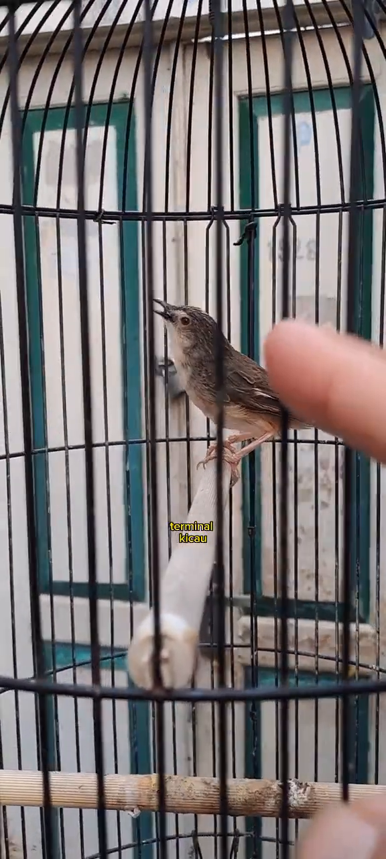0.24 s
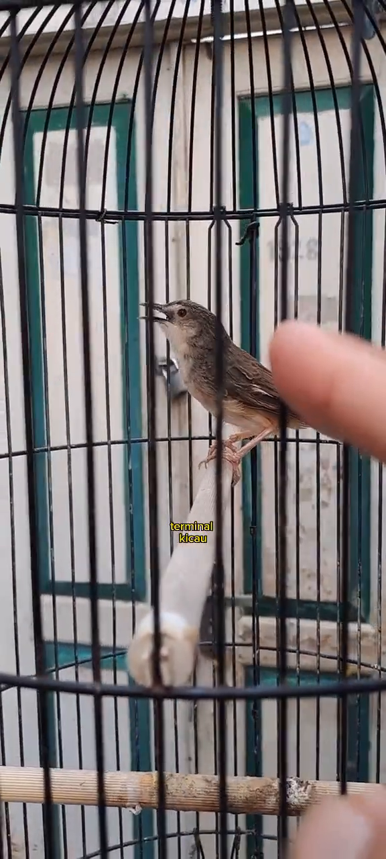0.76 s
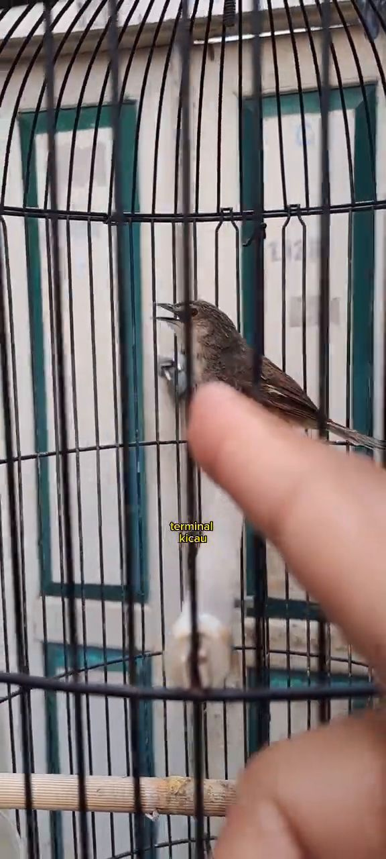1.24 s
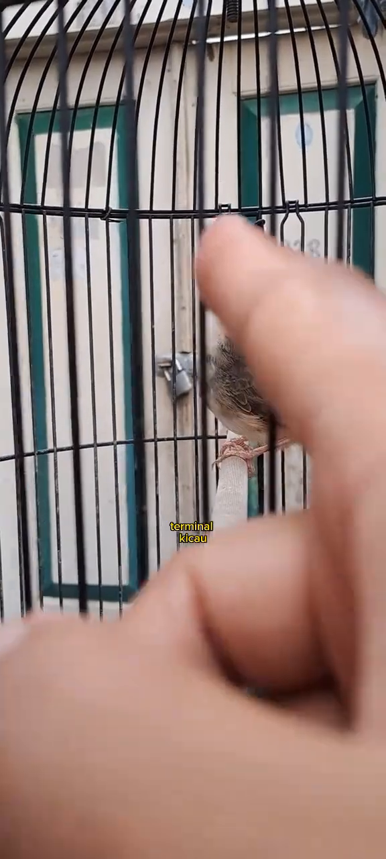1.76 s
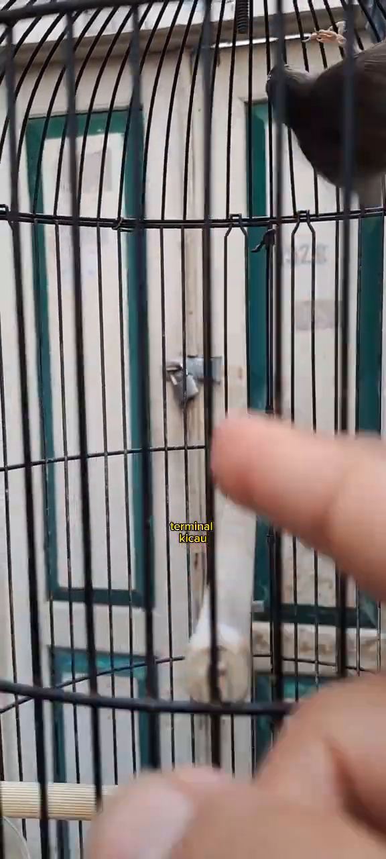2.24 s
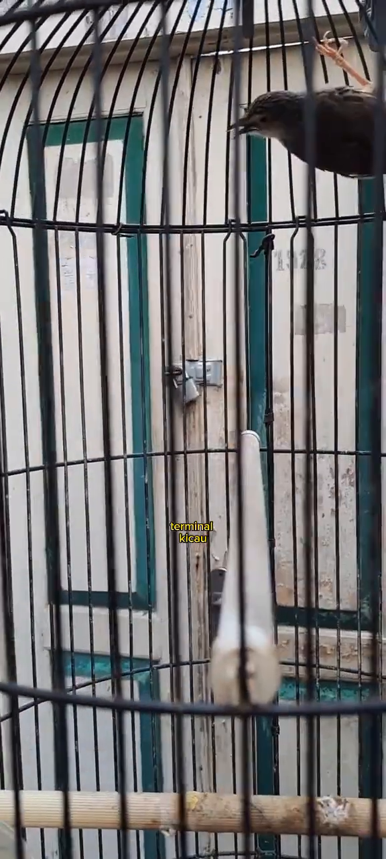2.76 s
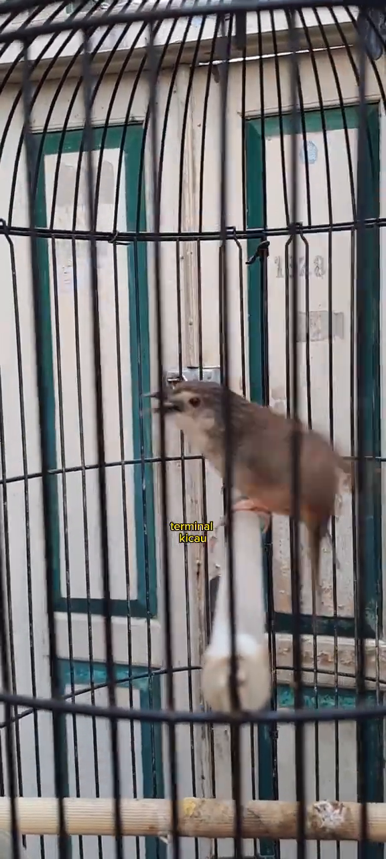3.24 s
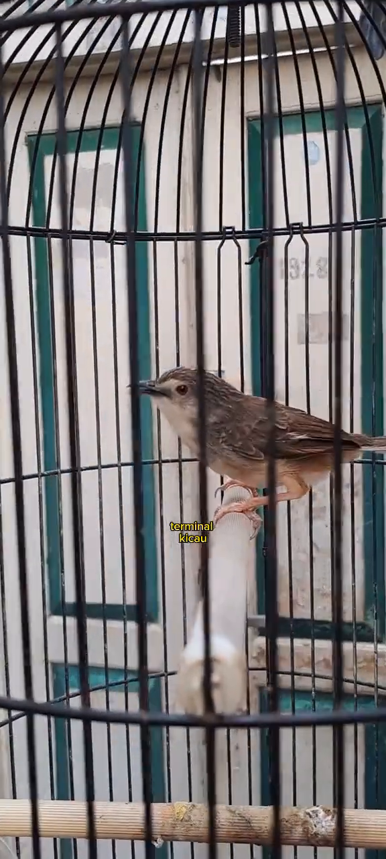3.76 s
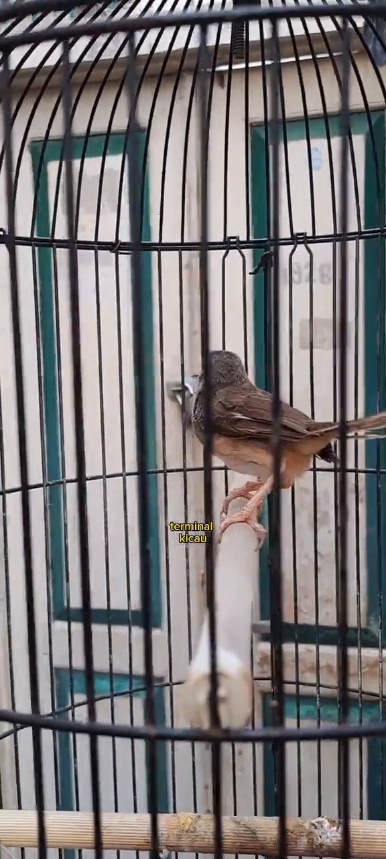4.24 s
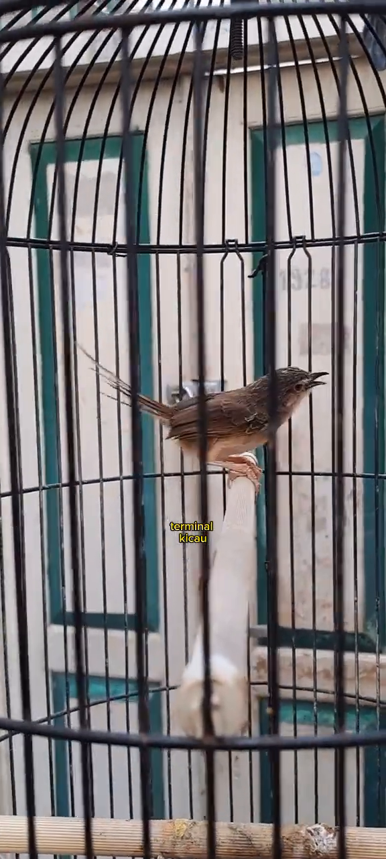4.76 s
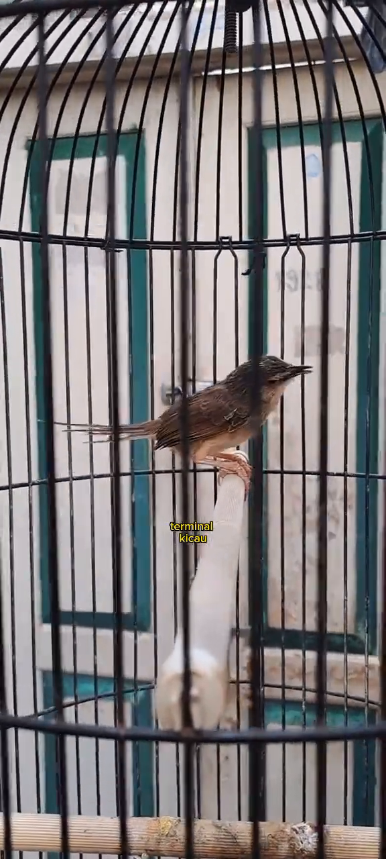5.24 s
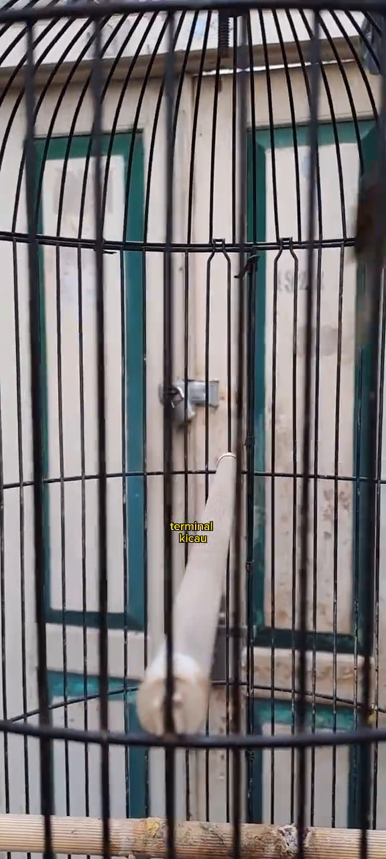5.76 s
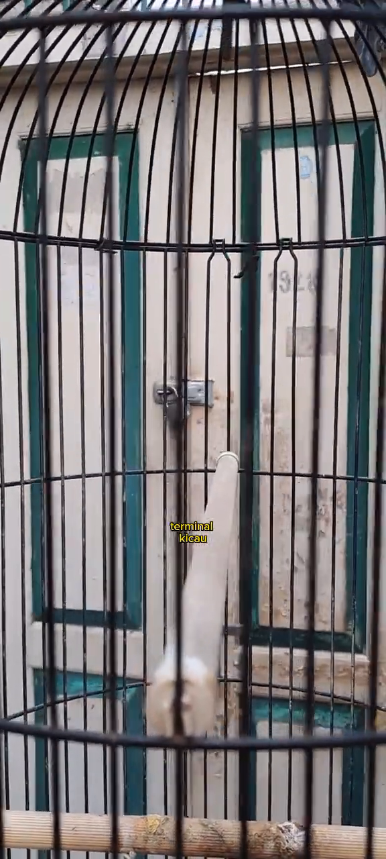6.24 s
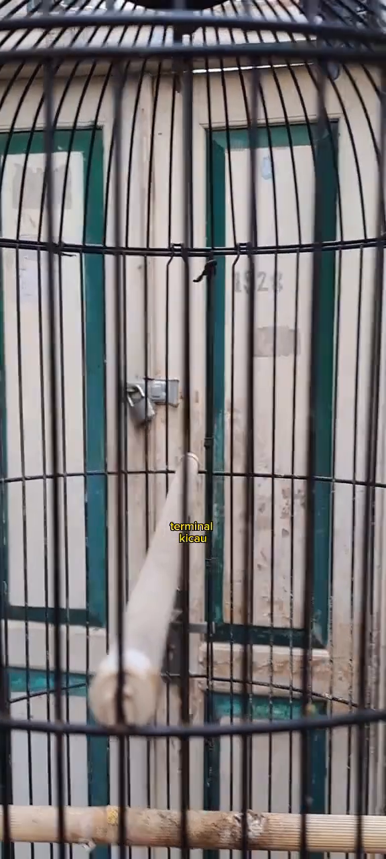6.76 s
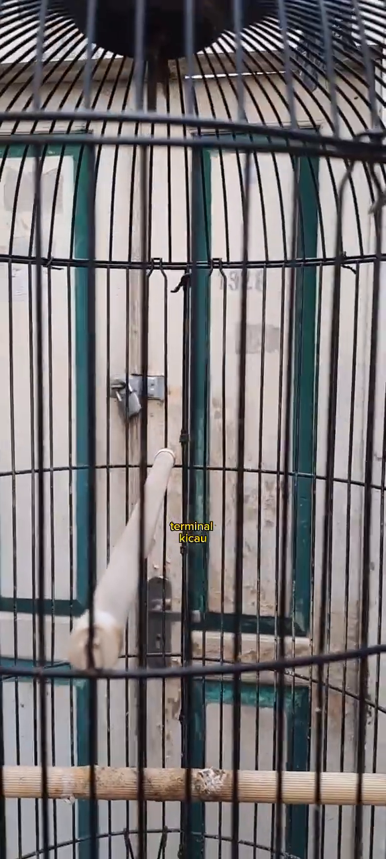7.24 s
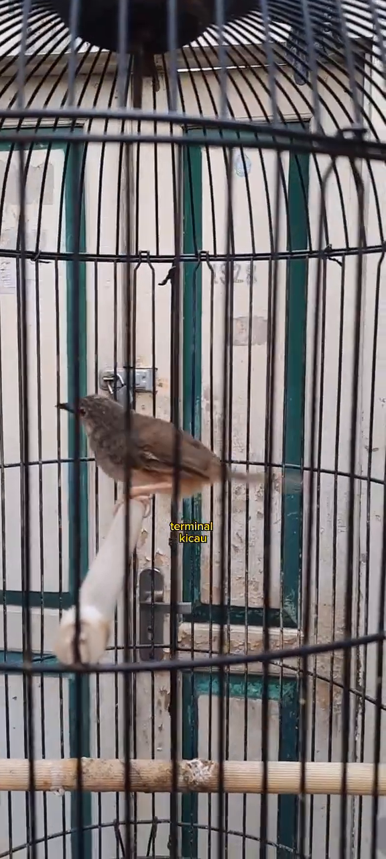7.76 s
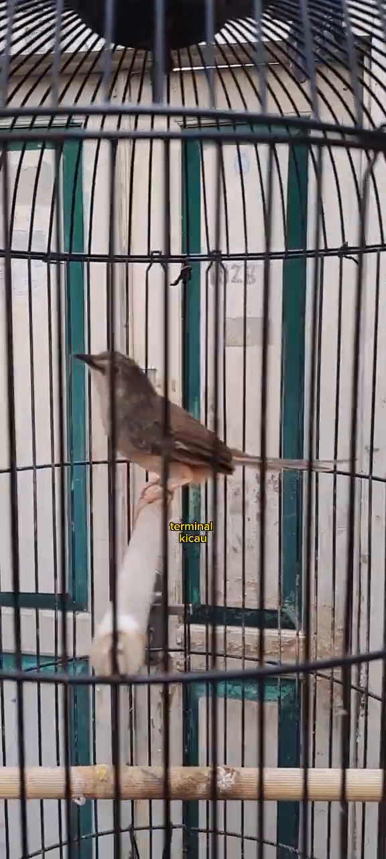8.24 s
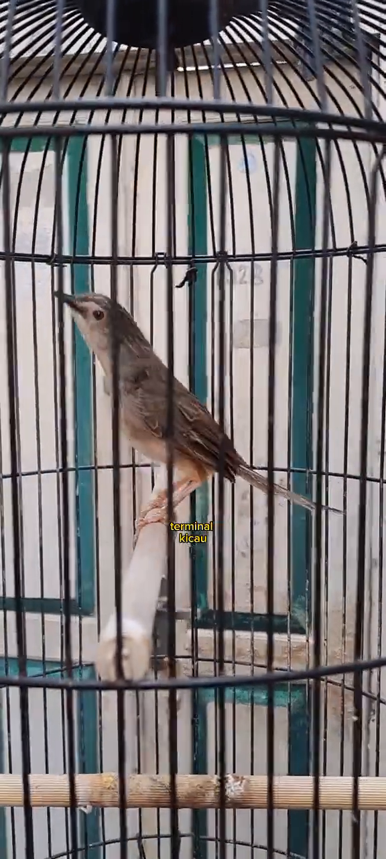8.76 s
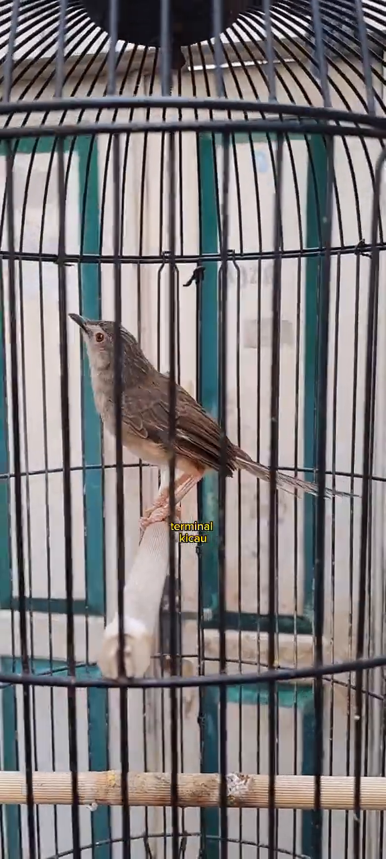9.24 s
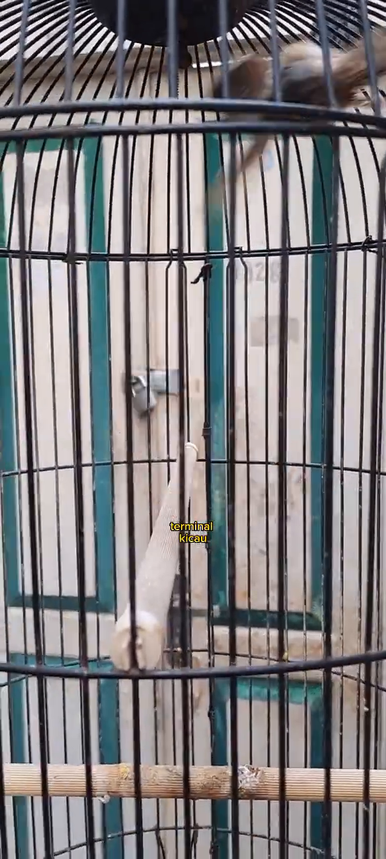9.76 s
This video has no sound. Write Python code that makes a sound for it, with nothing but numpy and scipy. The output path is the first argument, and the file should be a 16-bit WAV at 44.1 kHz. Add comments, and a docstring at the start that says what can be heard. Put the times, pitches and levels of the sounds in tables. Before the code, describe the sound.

A songbird sings near the microphone beside a building, snapping out chips about thirteen a second in bursts, then turning to short, rough-edged whistles, some like a second bird's answer. Light dull taps mark its landings. Behind it lie a faint low motor drone, soft traffic wash and hiss, and later a deeper approaching vehicle hum. Cage and wall add quick slapback and a brief diffuse tail.

```python
"""From the start an engine drones far off in street rumble, wash and hiss; a faint whine dies away by 2.6 s.
A caged prinia fires runs of falling chips, about 13 a second, until 5.6 s: swept sines with a rough snap.
Arched, husky whistles, some taken as a second bird's, come between and under the runs and go on to the end.
Hops knock softly from 2.4 s; a vehicle draws near after 6 s: noise in a narrow bass band.
Cage and wall return each bird sound as delayed copies and a diffuse tail of random pulses."""
import sys
import numpy as np
from scipy import signal
from scipy.fft import rfft, irfft, next_fast_len
from scipy.io import wavfile
from scipy.ndimage import map_coordinates

SR = 44100
rng = np.random.default_rng(int(sys.argv[2]) if len(sys.argv) > 2 else 0)


def to_wav(s):
    """Save 16-bit WAV."""
    ch = np.atleast_2d(s).T  # columns
    pcm = np.round(np.clip(ch, -1, 1) * 32767)  # PCM
    wavfile.write(sys.argv[1], SR, pcm.astype(np.int16))


N = 440559
TIME = np.arange(N) / SR

# Whistles. Each row: start in seconds, end in seconds, arch pitch at start, middle and end in Hz,
# base level in dB, left minus right in dB, husk in dB, sheen in dB.
WHISTLE_NOTES = [ (0.415, 0.552, 5750, 5556, 4920, -25.5, 2, 0.5, 11),
                 (0.687, 0.883, 5700, 5317, 4660, -24, -1, -5, 7),
                 (1.038, 1.229, 5094, 4984, 4450, -25, 0, -7, 3),
                 (3.499, 3.681, 4600, 4800, 4345, -36.5, 0, -4, 10),
                 (3.837, 4.023, 4800, 4800, 4490, -33.5, 4, 4.5, 7),
                 (5.753, 5.933, 4640, 5150, 5043, -25.5, -4.5, 0, 10),
                 (6.054, 6.261, 4720, 5144, 5180, -23, 6, -4, 6),
                 (6.481, 6.685, 3860, 4466, 4143, -26.5, -1, 1, -3.5),
                 (6.938, 7.12, 5134, 5603, 4970, -23.5, 1, -5, 8),
                 (7.227, 7.422, 5580, 5737, 4945, -19.5, 2, -15.5, -1.5),
                 (7.565, 7.759, 5250, 5428, 4720, -19, -5, -14.5, 0),
                 (7.985, 8.161, 4650, 4997, 4060, -25, -3, -3, 6.5),
                 (9.553, 9.743, 4600, 5180, 4820, -22, -0.5, 2.5, 14.5),
                 (9.864, 10.072, 4520, 4996, 5440, -27, 0, 7.5, 15)]


def gain_of(db):
    """Decibels to amplitude."""
    return 10 ** (np.asarray(db) / 20)


def unit_rms(x):
    """Scales to rms 1."""
    return x / np.sqrt(np.mean(x ** 2) + 1e-20)


def at_hz(points, hz):
    """Interpolates a (Hz, value) table on a log-frequency axis."""
    f, value = np.transpose(points)
    return np.interp(np.log(hz + 1), np.log(f + 1), value)


def curve(rows, axis=1):
    """One column of a time table at every sample."""
    rows = np.asarray(rows)
    return np.interp(TIME, rows[:, 0], rows[:, axis])


def add(mix, start_s, sound, pan_db):
    """Places a sound in time and by a left-right level difference."""
    part = mix[:, max(round(start_s * SR), 0):][:, :len(sound)]
    part += gain_of([[pan_db / 2], [-pan_db / 2]]) * sound[:part.shape[1]]


def wander(size, rate_hz):
    """Smooth random curve of rms 1 that moves up to about the given rate."""
    hz = np.fft.rfftfreq(size, 1 / SR)
    lowpass = np.exp(-(hz / rate_hz) ** 2 / 2)
    return unit_rms(irfft(rfft(rng.standard_normal(size)) * lowpass, size))


def tone(hz):
    """A sine of rms 1 that follows a pitch curve."""
    return np.sqrt(2) * np.sin(2 * np.pi * np.cumsum(hz) / SR)


def air(spectrum):
    """Stereo noise of rms 1, coloured by a spectrum; channels alike in the bass, nearly unrelated in the treble."""
    # Each row: frequency in Hz, left-right correlation.
    likeness = [(100, 1), (250, 0.99), (500, 0.86), (1000, 0.27), (2500, .1)]
    size = next_fast_len(N)
    hz = np.fft.rfftfreq(size, 1 / SR)
    left, other = rfft(rng.standard_normal((2, size)))
    same = np.clip(at_hz(likeness, hz), -1, 1)
    right = same * left + np.sqrt(1 - same ** 2) * other
    coloured = np.array([left, right]) * gain_of(at_hz(spectrum, hz))
    return unit_rms(irfft(coloured, size)[:, :N])


def engine():
    """The exhaust pulses at the firing rate; a throbbing fundamental carries weak overtones."""
    # Each row: time in seconds, firing rate in Hz.
    firing_rate = [(0, 56.7), (.5, 54.56), (1.03, 49.8), (1.45, 47.25), (1.7, 58), (2.11, 45), (4, 44.8),
                   (5, 43.78), (6.4, 41.38), (7.5, 42.4), (9, 38.9), (9.4, 42), (9.99, 39.86)]
    # Each row: time in seconds, level in dB.
    engine_level = [(0.0, -53), (0.22, -41), (1.42, -35), (1.55, -45.5), (2.23, -31), (2.36, -39.5),
                    (2.92, -31.5), (3.98, -33.5), (4.51, -28), (4.76, -31.5), (5.76, -24.5), (6.45, -30),
                    (7.9, -34), (8.12, -28), (8.62, -36), (8.68, -44.5), (9.63, -30.5), (9.99, -36)]
    hz = curve(firing_rate) * (1 + 0.01 * wander(N, 4))
    overtones = np.zeros(N)
    for k, db in enumerate([-22.5, -31.5, -21.5, -19.0], start=2):
        overtones += gain_of(db) * tone(k * hz) * (1 + .5 * wander(N, 5.6))
    fundamental = tone(hz) * (1 + .22 * wander(N, 9))
    return gain_of(curve(engine_level)) * (fundamental + overtones)


def traffic():
    """Bass rumble, an approaching vehicle, wide-band wash and hiss, all coloured noise."""
    # Each row: time in seconds, rumble level in dB, wash level in dB.
    street_level = [(0.0, -42, -56), (0.3, -42.5, -55.5), (1.78, -44, -57), (2.36, -41, -49),
                    (2.5, -45, -51), (2.75, -46, -54), (4.67, -42, -51.5), (7.37, -36, -47.5),
                    (8.76, -38, -52), (9.6, -36, -48.5), (9.71, -35, -46.5), (9.99, -42, -47)]
    # Levels of vehicle and hiss. Each row: time in seconds, level in dB.
    vehicle_level = [(0, -52.5), (6, -52), (7.4, -42.5), (7.9, -37.5), (8.7, -40), (9.4, -35.5),
                     (9.99, -35.5)]
    hiss_level = [(0, -47), (2, -68), (4.4, -66.5), (7, -67), (8.4, -69.5), (9.9, -75)]
    # Spectra. Each row: frequency in Hz, relative density in dB per Hz.
    rumble_spectrum = [(25, -17), (55, -7), (75, -3), (95, -0.5), (135, -1.5), (185, -9.5), (218, 1),
                       (250, -10), (290, -8), (420, -21), (700, -33), (3000, -92)]
    vehicle_spectrum = [(60, -34.5), (90, -4.5), (122, 2.5), (145, 3), (180, -14.5), (260, -31),
                        (2000, -100)]
    wash_spectrum = [(150, -28), (350, 0.5), (600, -4.5), (1000, -6.5), (1600, -10.5), (2500, -16),
                     (4000, -27), (7000, -33), (16000, -62.5)]
    hiss_spectrum = [(1500, -9), (3000, -11), (6300, -1.5), (9000, -10.5), (12000, -7.5), (16000, -21.5)]
    rumble = gain_of(curve(street_level)) * air(rumble_spectrum)
    vehicle = gain_of(curve(vehicle_level)) * air(vehicle_spectrum)
    wash = gain_of(curve(street_level, axis=2)) * air(wash_spectrum)
    hiss = gain_of(curve(hiss_level)) * air(hiss_spectrum)
    return rumble + vehicle + wash + hiss


def whine():
    """A faint far whine: a fixed tone under slow random modulation, dying away."""
    # Each row: time in seconds, level in dB.
    whine_level = [(0, -63), (.6, -65.5), (1.2, -61.5), (1.5, -70), (1.9, -68), (2.6, -95)]
    return gain_of(curve(whine_level)) * tone(np.full(N, 1635)) * wander(N, 35)


def tail():
    """Dense scatter from bars and nearby walls dies fast; the yard rings on, each band at its own speed."""
    # Each row: frequency in Hz, 60 dB decay time in seconds.
    decay_t60 = [(2000, 0.24), (5000, 0.26), (9000, 0.1), (15000, 0.14)]
    # The tail is brighter in the high treble. Each row: frequency in Hz, tail lift in dB.
    treble_lift = [(3500, -1), (6000, 0.5), (8500, 8), (14000, 9.5)]
    scatter_db, scatter_decay_s = -5.5, .014
    ring_db, ring_onset_s = -6, .0058
    # sparse pulses of random sign
    near, far = rng.choice([-1., 1.], (2, 2, SR)) * (rng.random((2, 2, SR)) < .1)
    age_s = np.arange(SR) / SR

    hz, t, bands = signal.stft(far, SR, nperseg=256)
    decay = 1000 ** (-t / at_hz(decay_t60, hz)[:, None])
    ring = signal.istft(bands * decay, SR, nperseg=256)[1][:, :SR]
    ring = ring * (1 - np.exp(-age_s / ring_onset_s))
    ring_gain = gain_of(ring_db + at_hz(treble_lift, np.fft.rfftfreq(SR, 1 / SR)))
    ring = irfft(rfft(ring / np.linalg.norm(ring[0])) * ring_gain, SR)

    scatter = near * np.exp(-age_s / scatter_decay_s) * (age_s > .001)
    return gain_of(scatter_db) * scatter / np.linalg.norm(scatter[0]) + ring


def yard(bird):
    """Distinct echoes with drifting delays, then a diffuse tail that changes as the bird moves about."""
    # Cage and wall. Each row: mean delay in ms, level in dB.
    reflections = [(.45, -13), (1.3, -17), (20.2, -12), (25.2, -20)]
    skew_ms = 0.077
    mono, wet = bird.mean(0), np.zeros((2, N))
    for ms, db in reflections:
        for channel, direct in zip(wet, bird):
            # paths lengthen and shorten a little as the bird shifts
            drift = np.interp(TIME, np.linspace(0, TIME[-1], 14), rng.standard_normal(14))
            delay_s = (ms + skew_ms * drift) / 1000
            channel += gain_of(db) * map_coordinates(direct, [(TIME - delay_s) * SR], order=3)
    # three tails take turns at constant total power
    for k in range(3):
        share = np.sqrt(2 / 3) * np.cos(2 * np.pi * (.6 * TIME + k / 3))
        wet += signal.fftconvolve((mono * share)[None], tail(), axes=1)[:, :N]
    return wet


def hops():
    """The bird lands on perch or bars: decaying bursts of dull noise."""
    # Each row: landing in seconds, level in dB.
    landings = [(2.36, -58), (3.27, -51), (5.885, -42), (7.745, -45)]
    # Each row: frequency in Hz, relative density in dB per Hz.
    knock_spectrum = [(250, -22), (550, -1), (900, -4), (1400, -12.5), (2200, -12), (5000, -35)]
    decay_s = .03
    loud = sum(gain_of(db) * (TIME > s) * np.exp(-abs(TIME - s) / decay_s) for s, db in landings)
    return loud * air(knock_spectrum)


def peeps(mix):
    """Adds faint far notes: unsteady, gently falling sines."""
    # Each row: start in seconds, length in seconds, first Hz, last Hz, level in dB.
    far_notes = [(6.291, 0.19, 5840, 5420, -57), (9.772, 0.16, 3850, 3470, -49.5)]
    for start_s, length_s, first_hz, last_hz, level_db in far_notes:
        size = round(length_s * SR)
        hz = np.geomspace(first_hz, last_hz, size) + 90 * wander(size, 300)
        add(mix, start_s, gain_of(level_db) * tone(hz) * signal.windows.tukey(size, .5), 0)


def rasps():
    """Air in the syrinx: each whistle catches and lets go with a short swell of noise."""
    # Each row: frequency in Hz, relative density in dB per Hz.
    rasp_spectrum = [(1500, -26), (2600, -11.5), (4000, 2), (7000, -1), (9000, -6.5), (12000, -10.5),
                     (15000, -13), (16000, -15.5)]
    open_db, open_width_s = -22, .015
    close_db, close_width_s = -16, .039
    loud = np.zeros((2, N))
    t = np.arange(-.1, .1, 1 / SR)
    for start_s, end_s, *_, level_db, _, husk_db, _ in WHISTLE_NOTES:
        strength = gain_of(level_db + husk_db / 2)
        opening = gain_of(open_db) * np.exp(-(t / open_width_s) ** 2)
        closing = gain_of(close_db) * np.exp(-(t / close_width_s) ** 2)
        add(loud, start_s + t[0], strength * opening, 0)
        add(loud, end_s + t[0], strength * closing, 0)
    return loud * air(rasp_spectrum)


def whistle(length_s, pitches_hz, level_db, husk_db, sheen_db):
    """An arch scoops up and ends in a downward flick; slower vibration adds half-pitch lines and husk."""
    # Parallel lines. Each row: offset above the note in Hz, relative level in dB.
    whistle_lines = [(5510, -28.5), (9660, -28)]
    # Swell at even steps through the note, one column: relative level in dB.
    swell_steps = [-20, -7, -5.5, -2, -3.5, -2, -8]
    scoop_hz, scoop_s = 170, .014
    flick_hz, flick_s, flick_db = 1100, .0048, -9
    flare_db, flare_s = 12, .012
    t = np.arange(0, length_s, 1 / SR)
    along, size = t / length_s, len(t)
    flick = np.exp((t - length_s) / flick_s)

    count = len(pitches_hz)
    arch_hz = np.polyval(np.polyfit(np.linspace(0, 1, count), pitches_hz, count - 1), along)
    hz = arch_hz - scoop_hz * np.exp(-t / scoop_s) - flick_hz * flick + 32 * wander(size, 220)
    swell_db = np.interp(along, np.linspace(0, 1, len(swell_steps)), swell_steps)
    loud = gain_of(level_db + swell_db + flick_db * flick + 1.6 * wander(size, 50))

    half_pitch = gain_of(-31) * tone(hz / 2) * (1 + 0.33 * wander(size, 70))
    half_sheen = gain_of(-42) * tone(hz / 2 + whistle_lines[-1][0])
    rough_line = gain_of(-17.5) * tone(hz + hz / 2) * wander(size, 420)
    husk = half_pitch + half_sheen + rough_line

    sheen = np.zeros(size)
    for above_hz, db in whistle_lines:
        sheen += gain_of(db) * tone(hz + above_hz) * (1 + .5 * wander(size, 220))
    flare = flare_db * np.exp((t - length_s) / flare_s)  # brighter as it closes

    # husk swells less than the pure tone, so it stands out at the start
    steady = np.sqrt(loud * gain_of(level_db))
    bright = loud * (tone(hz) + gain_of(sheen_db + flare) * sheen)
    return (bright + steady * gain_of(husk_db) * husk) * signal.windows.tukey(size, .04)


def whistles(mix):
    """Adds every whistle of the table, each sung afresh."""
    for start_s, end_s, *pitches_hz, level_db, pan_db, husk_db, sheen_db in WHISTLE_NOTES:
        add(mix, start_s, whistle(end_s - start_s, pitches_hz, level_db, husk_db, sheen_db), pan_db)


def lead_in(level_db, length_s):
    """A faint, unsteady thin tone near 7.1 kHz leads into each chip."""
    size = round(length_s * SR)
    loud = gain_of(level_db - 34 + 5 * rng.standard_normal())
    hz = 7120 + 169.4 * wander(size, 400)
    return loud * tone(hz) * signal.windows.tukey(size, .5)


def chip(octave_s, level_db, accent_db, stop_hz):
    """The syrinx slackens: a pure tone plunges from 6.7 kHz to a rough snap and a weak foot."""
    # Loudness along the fall. Each row: pitch in Hz, relative level in dB.
    fall_shape = [(2000, -22), (2500, -8.5), (3100, 0.5), (3950, 1), (4800, 0), (5900, -1), (6400, -4.5),
                  (6700, -30.5)]
    # Parallel lines. Each row: offset above the note in Hz, relative level in dB.
    chip_lines = [(5510, -37), (9660, -36.5)]
    top_hz, rest_hz, ceiling_hz = 6500, 1200, 6700
    foot_db, fizz_db, snap_db, snap_hz = -16.5, -33, -20, 2900
    lead_s = octave_s / 8
    t = np.arange(-lead_s, 1.4 * octave_s, 1 / SR)
    size = len(t)

    # exponential fall towards rest_hz, an octave below top_hz after octave_s
    span_hz = top_hz - rest_hz
    ratio = (top_hz / 2 - rest_hz) / span_hz
    hz = np.minimum(rest_hz + span_hz * ratio ** (t / octave_s), ceiling_hz)

    tilt_db = accent_db * np.interp(hz, [4200, 5800], [-.4, .6])
    break_db = foot_db * np.interp(hz - stop_hz, [-550, -80, 200], [1, .6, 0])
    loud = gain_of(level_db + at_hz(fall_shape, hz) + tilt_db + break_db + wander(size, 250))

    sheen = np.zeros(size)
    for above_hz, db in chip_lines:
        line_gain = gain_of(db + 2 * rng.standard_normal())
        sheen += line_gain * tone(hz + above_hz) * (1 + .8 * wander(size, 400))
    fizz_gain = gain_of(fizz_db + 2 * rng.standard_normal())
    fizz = fizz_gain * wander(size, 3600) * tone(np.full(size, 12000))
    near_break = np.exp(-((hz - stop_hz) / 600) ** 2)
    snap = gain_of(level_db + snap_db) * near_break * wander(size, 470) * tone(np.full(size, snap_hz))
    return lead_s, (loud * (tone(hz) + sheen + fizz) + snap) * signal.windows.tukey(size, .12)


def runs():
    """Chips follow at a gently drifting pace, each sung as the delivery stands at that moment."""
    # Each row is a stretch of steadily drifting tempo; stretches make up the runs.
    # Each row: first chip in seconds, number of chips, first gap in seconds, growth of each further gap in seconds.
    stretches = [(.0323, 8, .0729, .0008), (2.0863, 9, .0706, .00034), (2.7401, 8, .0729, -.0002),
                 (3.322, 8, .0748, -.00025), (3.9176, 5, .0757, -.0003), (4.7316, 6, .0694, .00126),
                 (5.1683, 5, .0748, .0001)]
    # Steeper chips that open a run after a rest, one column: time in seconds.
    openers = [2.0254, 4.669]
    # Each row: time in seconds, level in dB, accent of the high start over the low end in dB,
    # break pitch in Hz, left minus right in dB.
    delivery = [(.03, -15.5, 2, 3600, 2.5), (.56, -16.5, -4.5, 3450, 1), (2.03, -16.5, -3, 3600, 7),
                (2.16, -22, -3, 3100, 0), (2.23, -22, -2, 3200, 3), (2.34, -15, -1, 3445, 0.5),
                (2.58, -15.5, 1.5, 3450, -1), (2.72, -17.5, 0.5, 3330, 1.5), (3.101, -16.5, 6, 3350, .5),
                (3.17, -14, 1, 3550, -0.5), (3.55, -14, -0.5, 3750, 3.5), (3.86, -15, .5, 3780, 3.5),
                (4, -16.5, -2, 3700, 1.5), (4.22, -17.5, 0.5, 3740, 3), (4.701, -20.5, -2, 3790, 4),
                (5.15, -18.5, 0.5, 3580, 4), (5.47, -16, .5, 3400, 2.5)]
    chip_octave_s, opener_octave_s, lead_in_s = .0195, .012, .028
    level_spread_db, break_spread_hz = .5, 120

    beats = [(s, opener_octave_s) for s in openers]
    for first_s, count, gap_s, growth_s in stretches:
        for k in range(count):
            beats.append((first_s + k * gap_s + k * (k - 1) / 2 * growth_s, chip_octave_s))

    mix = np.zeros((2, N))
    times, *controls = np.transpose(delivery)
    for s, octave_s in beats:
        level_db, accent_db, stop_hz, pan_db = (np.interp(s, times, column) for column in controls)
        level_luck, break_luck = rng.standard_normal(2)
        chip_db = level_db + level_spread_db * level_luck
        lead_s, sound = chip(octave_s, chip_db, accent_db, stop_hz + break_spread_hz * break_luck)
        add(mix, s - lead_s, sound, pan_db)
        add(mix, s + lead_s - lead_in_s, lead_in(level_db, lead_in_s), pan_db)
    return mix


def song():
    """All chips, whistles, rasps and peeps, dry."""
    mix = rasps() + runs()
    whistles(mix)
    peeps(mix)
    return mix


def scene():
    """The street, the bird and its echoes."""
    bird = song() + hops()
    return engine() + traffic() + whine() + bird + yard(bird)


def record(dry):
    """Peaks are softly limited for headroom; a lowpass then ends the band near 16 kHz."""
    knee, room, edge_hz = .5, .25, 16050
    size = abs(dry)
    excess = np.maximum(size - knee, 0)
    limited = np.sign(dry) * (np.minimum(size, knee) + room * np.tanh(excess / room))
    lowpass = signal.firwin(511, edge_hz, window=("kaiser", 9), fs=SR)
    return signal.oaconvolve(limited, lowpass[None], "same", axes=1)


dry = scene()
out = record(dry)
to_wav(out)
```